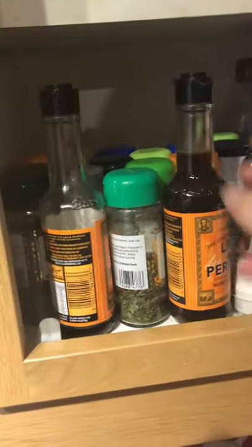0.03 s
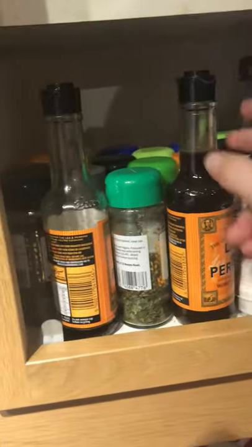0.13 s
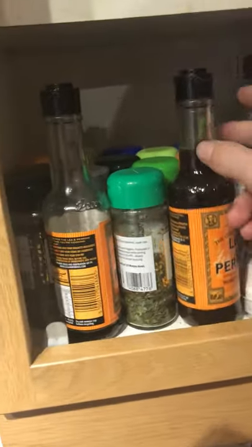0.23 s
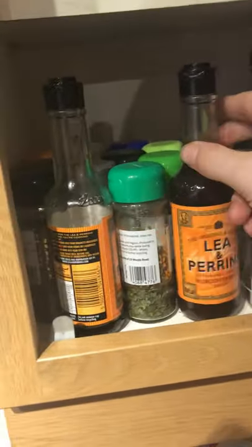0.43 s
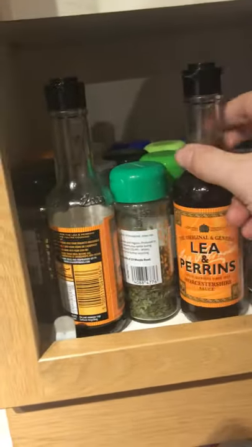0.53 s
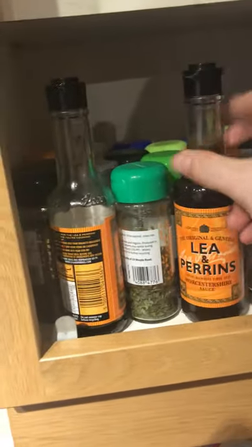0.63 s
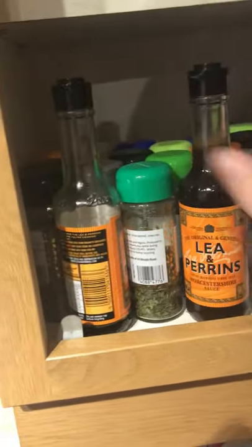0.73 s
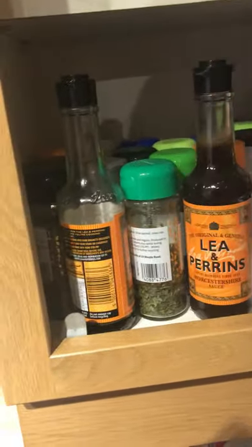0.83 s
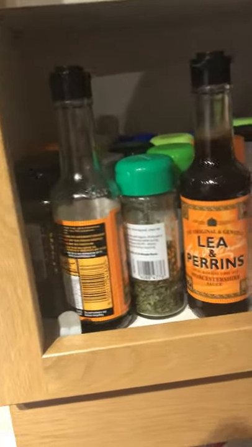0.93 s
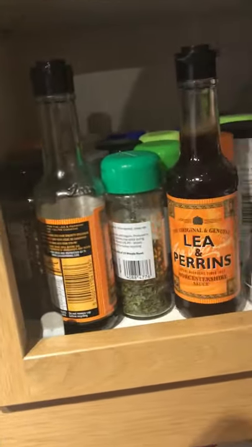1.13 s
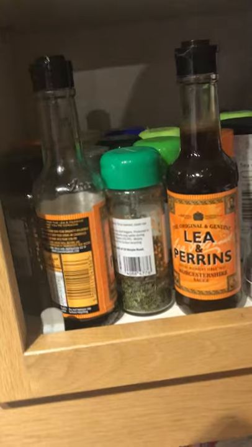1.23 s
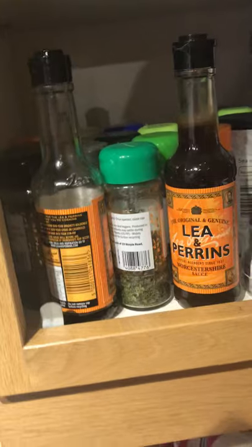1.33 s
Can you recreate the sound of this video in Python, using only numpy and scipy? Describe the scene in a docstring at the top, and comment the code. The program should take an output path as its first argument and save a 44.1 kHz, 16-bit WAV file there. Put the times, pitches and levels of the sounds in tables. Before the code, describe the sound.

A full glass bottle is turned on a shelf, clinking on a neighbouring bottle and jars, bumping and dragging on wood with a boxy boom; then only fridge hum and faint whine remain, heard close on a phone.

```python
"""Bottle in a kitchen cupboard

A hand turns a full glass bottle in a wooden cupboard: it clinks on jars and a neighbouring bottle, knocks
and drags on the shelf, and the box booms, while a fridge hums and whines. Glass, board and box are sums of
decaying modes; cracks and scuffs are noise bursts, the drag is random grains, the fridge is coloured noise
plus wavering sines. Wall echoes and a diffuse tail enclose the cupboard sounds."""
import sys
import numpy as np
from scipy import signal
from scipy.fft import rfft, irfft
from scipy.io import wavfile

SR = 44100
rng = np.random.default_rng(int(sys.argv[2]) if len(sys.argv) > 2 else 0)


def to_wav(sig):
    """Store sig (one row per channel, or 1-D mono) as 16-bit WAV at the path in sys.argv[1].

    Samples outside -1..1 are clipped; the rate is SR.
    """
    pcm = np.clip(np.atleast_2d(sig), -1, 1) * 32767
    pcm = np.round(pcm).astype(np.int16)
    wavfile.write(sys.argv[1], SR, pcm.T)  # frames by channels


def volts(x):
    """Linear amplitude factor 10**(x/20) for a level x in dB, scalar or array-like."""
    e = np.asarray(x, float) / 20
    return 10 ** e


N = 61739  # samples

# Free ring of each glass object, by name: mode_hz, level_db, t60_s
GLASS_MODES = { "empty bottle": [(2440, -5, 0.016), (2900, 2, 0.016), (3750, -5.5, 0.028),
               (5870, -3.5, 0.019), (8240, -5, 0.014), (8590, 4, 0.011), (9050, 2, 0.008),
               (9780, -2, 0.007), (12000, -17, .012)], "small jar": [(6056, -9, .17), (6245, 2, .05),
               (6120, -4, .06)], "wide jar": [(328, -11, 0.094), (885, -3, 0.08), (1312, 0, 0.025),
               (1595, -1, 0.022), (1810, -2, .025)], "tall bottle": [(3365, 0, .42), (6735, -25, .35),
               (7354, -25, .35), (1316, -2, 0.032), (1910, 5, 0.021), (2110, -11.5, 0.11),
               (2980, 12.5, 0.0035), (4750, -1, 0.055), (8630, 4, 0.0062), (9480, -2.5, 0.096),
               (11960, -22, 0.1), (13200, -1.5, 0.019)], "full bottle": [(3284, 0, .52), (7294, -18, .3),
               (2750, 12, 0.031), (4450, 1, 0.034), (4680, 7, 0.041)], "spice jar": [(1422, 2.5, 0.048),
               (1750, -5, 0.033), (2720, 3, 0.024), (5250, 2.5, 0.024), (5060, -8.5, 0.066)], }
# Glass on glass: start_s, object, ring_level_db, contact_ms, crack_level_db, share of free t60 left by the hand
CLINKS = [(.2026, "empty bottle", -14, .03, -26, 1), (.2042, "small jar", -17, .1, -36, 1),
          (.2040, "wide jar", -17, .1, -36, 1), (.3762, "tall bottle", -25, .04, -30, 1),
          (.3762, "full bottle", -42, .04, -44, 1), (.3785, "small jar", -27, .1, -44, .5),
          (.4052, "spice jar", -26, .1, -38, 1), (.4342, "tall bottle", -22, .11, -29, .45),
          (.4342, "full bottle", -32, .05, -44, 1)]
# Ring of the shelf board: mode_hz, level_db, t60_s
SHELF_MODES = [(700, -11, .03), (785, -8, .035), (872, 0, .04), (972, 3, .05), (1012, -12, .22),
               (1240, -9, .06), (1500, -12, .05), (1650, -12, .04), (1820, -14, .04)]
# Bottle base on the shelf: start_s, level_db, contact_ms, scuff_level_db
KNOCKS = [(.234, -52, 0.082, -45), (.272, -65, 0.2, -44), (0.381, -28, 0.29, -63), (0.422, -18, 1, -28.5),
          (0.444, -44, 0.49, -75), (.472, -28, 0.41, -63), (.490, -29.5, 0.7, -69), (0.508, -45, 0.11, -68),
          (0.549, -39.5, 0.32, -61), (0.594, -43.5, 0.76, -69)]
# Boom of the cupboard box: mode_hz, level_db, t60_s
BOX_MODES = [(90.5, -6, 0.17), (154.3, -5.5, 0.16), (209.9, 1, 0.26), (241, 0.5, 0.18), (349, 6.5, 0.065)]
# Soft blows to the box: start_s, level_db, contact_ms
THUMPS = [(.204, -39.5, 4.2), (.275, -43, 0.98), (.386, -34, 0.43), (0.402, -40, 0.85), (0.436, -17, 11),
          (0.473, -39.5, 5.4), (0.506, -31.5, 2.8), (0.612, -41, 8.3)]
# Level of the base dragging over the shelf: time_s, level_db
DRAG_LEVEL = [(.195, -65), (.21, -44), (.25, -48.5), (.28, -40), (.31, -53), (.36, -51.5), (.40, -43),
              (.45, -45), (.48, -32), (.52, -40), (.57, -54), (.66, -57.5), (.75, -66.5)]
# Drag spectrum before the board's lift: freq_hz, density_db_per_hz (relative)
DRAG_COLOUR = [(200, -2), (400, 6), (560, -5), (850, -10), (1300, 1), (2000, -4.5), (3500, -7),
               (7000, -17.5), (10000, -20.5), (16000, -28)]
# Cupboard wall reflections: delay_ms, gain (linear)
WALL_ECHOES = [(.9, .4), (1.75, .4), (2.7, .3), (3.9, .2)]
# Room air spectrum: freq_hz, density_db_per_hz (relative)
ROOM_COLOUR = [(20, -11), (42, -9), (60, -8.5), (100, -1), (204, -12), (500, -21.5), (1000, -24),
               (1700, -31.5), (2700, -29), (3700, -24.5), (4200, -30.5), (5400, -32.5), (7100, -32),
               (10400, -34), (10700, -28.5), (12500, -24), (16000, -23)]
# Fridge whine bands: centre_hz, width_hz, lift_db over the room air
WHINE_BANDS = [(1200, 500, 6), (2350, 250, 10), (3200, 450, 12), (4750, 140, 11), (4680, 500, 14),
               (6050, 350, 14), (6570, 250, 14), (7650, 90, 14), (8560, 150, 9), (9080, 200, 10),
               (9680, 60, 12), (11150, 800, 10), (13600, 900, 7), (14630, 350, 12), (15570, 300, 12)]
# Fridge mains hum: freq_hz, level_db (rms before the waver)
HUM_TONES = [(100, -61), (200.5, -60.5), (300.5, -72.5), (401, -73)]


def curve(rows, at, warp=lambda v: v):
    """Join table rows by straight lines on a warped axis."""
    rows = np.array(rows, float)
    return np.interp(warp(at), warp(rows[:, 0]), rows[:, 1])


def shaped(x, db_of_hz):
    """Colour a sound by a spectrum in dB and bring it to rms 1."""
    hz = np.maximum(np.fft.rfftfreq(len(x), 1 / SR), 1)
    y = irfft(rfft(x) * volts(db_of_hz(hz)), len(x))
    return y / np.sqrt(np.mean(y ** 2))


def decay(t, t60_s):
    """Exponential fall of 60 dB in t60_s."""
    return np.exp(-np.log(1000) * t / t60_s)


def burst(noise, start_s, level_db, t60_s):
    """Noise that starts at once and dies away."""
    t = np.arange(N) / SR - start_s
    return volts(level_db) * noise * (t > 0) * decay(np.abs(t), t60_s)


def strike(modes, start_s, level_db, contact_ms):
    """A blow rings all modes; longer contact swells in slower and weakens high modes."""
    t = np.maximum(np.arange(N) / SR - start_s, 0)
    hz, mode_db, t60_s = np.array(modes, float).T[:, :, None]
    contact_s = contact_ms / 1000
    sense = (-1.) ** np.arange(len(modes))[:, None]  # neighbouring rows in opposite sense
    gain = sense * volts(mode_db) / (1 + (hz * contact_s) ** 2)
    rings = gain * decay(t, t60_s) * np.sin(2 * np.pi * hz * t)
    swell = 1 - np.exp(-t / contact_s)
    return volts(level_db) * rings.sum(axis=0) * swell


def room_and_whine():
    """Room air noise, lifted in resonance-shaped bands where the fridge whines."""
    noise_rms_db = -50

    def colour(hz):
        whine = sum(lift_db / (1 + (2 * (hz - f) / width_hz) ** 2) for f, width_hz, lift_db in WHINE_BANDS)
        return curve(ROOM_COLOUR, hz, np.log) + whine

    return volts(noise_rms_db) * shaped(rng.standard_normal(N), colour)


def fridge_hum():
    """Mains hum: sines, each wavering slowly in level on its own."""
    waver_rms_db, waver_corner_hz = 1.0, 8
    t = np.arange(N) / SR
    out = np.zeros(N)
    for hz, level_db in HUM_TONES:
        slow = shaped(rng.standard_normal(N), lambda f: -20 * np.log10(1 + (f / waver_corner_hz) ** 2))
        tone = np.sqrt(2) * np.sin(2 * np.pi * (hz * t + rng.random()))
        out += volts(level_db) * volts(waver_rms_db * slow) * tone
    return out


def drag():
    """Friction as dense uneven grains of random sign, coloured by the shelf board's modes."""
    grains_per_s, grain_spread_db, board_lift_db = 3000, 2.5, 6
    present, sign, size = rng.random((3, N))
    grain_gain = volts(-grain_spread_db * np.log(1 - size))  # exponential spread in dB
    grains = (present < grains_per_s / SR) * np.sign(sign - .5) * grain_gain

    def colour(hz):
        board = sum(board_lift_db / (1 + ((hz - f) * t60_s * np.pi / np.log(1000)) ** 2)
                    for f, _, t60_s in SHELF_MODES)
        return curve(DRAG_COLOUR, hz, np.log) + board

    return shaped(grains, colour) * volts(curve(DRAG_LEVEL, np.arange(N) / SR))


def glass():
    """Each clink cracks and rings its object; a new contact damps that object's old ring."""
    crack_t60_s, crack_corner_hz, damping_s = 0.023, 4500, 0.0019

    def crack_colour(hz):
        return 20 * np.log10(hz / 1000 / (1 + hz / 1000) / (1 + (hz / crack_corner_hz) ** 2))

    t = np.arange(N) / SR
    grit = shaped(rng.standard_normal(N), crack_colour)
    out = np.zeros(N)
    for start_s, name, level_db, contact_ms, crack_db, t60_share in CLINKS:
        later_s = [row[0] for row in CLINKS if row[1] == name and row[0] > start_s]
        again_s = min(later_s + [N])  # N: never
        modes = np.array(GLASS_MODES[name]) * [1, 1, t60_share]
        ring = strike(modes, start_s, level_db, contact_ms)
        out += ring * np.exp(-np.maximum(t - again_s, 0) / damping_s)
        out += burst(grit, start_s, crack_db, crack_t60_s)
    return out


def box_thumps():
    """Soft blows set the low modes of the cupboard box booming."""
    return sum(strike(BOX_MODES, start_s, level_db, contact_ms) for start_s, level_db, contact_ms in THUMPS)


def shelf_knocks():
    """Knocks ring the board, mode levels varying with the place hit, under a short bright scuff."""
    scuff_t60_s, spot_spread_db = .045, 2
    grit = shaped(rng.standard_normal(N), lambda hz: 10 * np.log10(hz))
    # only the level column varies
    spots = spot_spread_db * rng.standard_normal((len(KNOCKS), len(SHELF_MODES), 1)) * [0, 1, 0]
    out = np.zeros(N)
    for spot, (start_s, level_db, contact_ms, scuff_db) in zip(spots, KNOCKS):
        out += strike(SHELF_MODES + spot, start_s, level_db, contact_ms)
        out += burst(grit, start_s, scuff_db, scuff_t60_s)
    return out


def cupboard(x):
    """The box gives off no deep bass; its walls add a few echoes and a short diffuse tail."""
    low_cut_hz, tail_db, tail_t60_s, tail_top_hz = 62, -14, .15, 6000
    x = signal.sosfilt(signal.butter(3, low_cut_hz, "high", fs=SR, output="sos"), x)
    n = np.arange(N)
    walls = sum(gain * np.interp(n - ms * SR / 1000, n, x, left=0) for ms, gain in WALL_ECHOES)
    t = np.arange(SR // 2) / SR
    noise = shaped(rng.standard_normal(len(t)), lambda hz: -10 * np.log10(1 + (hz / tail_top_hz) ** 4))
    tail = noise * decay(t, tail_t60_s)
    tail = tail / np.sqrt(np.sum(tail ** 2))  # unit energy
    return x + walls + volts(tail_db) * signal.fftconvolve(x, tail)[:N]


def scene():
    """Bottle sounds inside the cupboard, over the kitchen; one channel."""
    kitchen = room_and_whine() + fridge_hum()
    inside = drag() + glass() + box_thumps() + shelf_knocks()
    return (cupboard(inside) + kitchen)[None]


def roll_off(x):
    """The treble ends steeply here."""
    return signal.sosfilt(signal.butter(12, 16850, fs=SR, output="sos"), x)


def record(dry):
    """The phone cuts the top steeply."""
    top_hz, ripple_db, stop_db = 15720, .5, 50
    mix = signal.sosfilt(signal.ellip(14, ripple_db, stop_db, top_hz, fs=SR, output="sos"), dry)
    return roll_off(mix)


dry = scene()
out = record(dry)
to_wav(out)
```